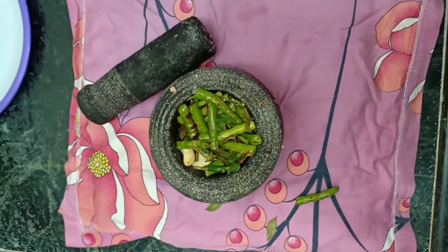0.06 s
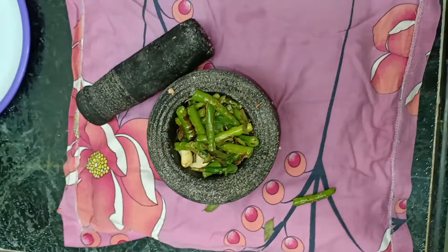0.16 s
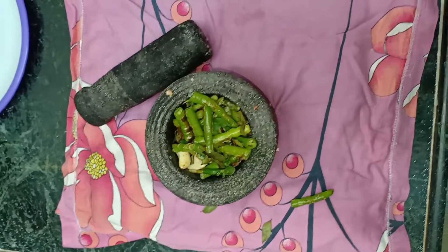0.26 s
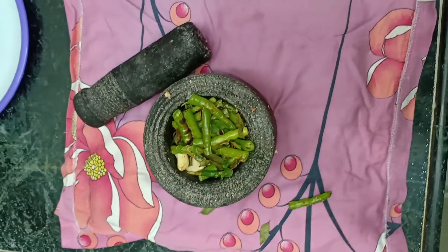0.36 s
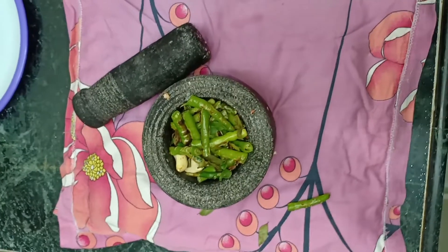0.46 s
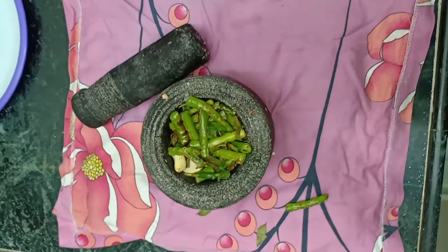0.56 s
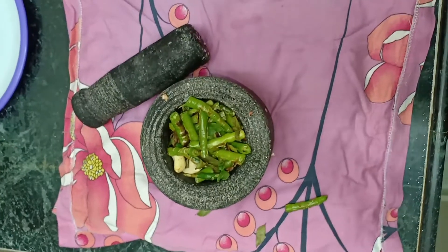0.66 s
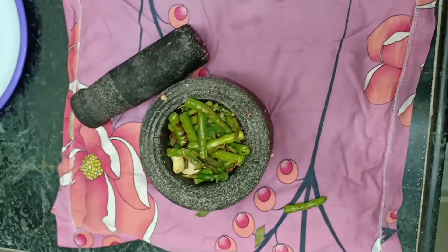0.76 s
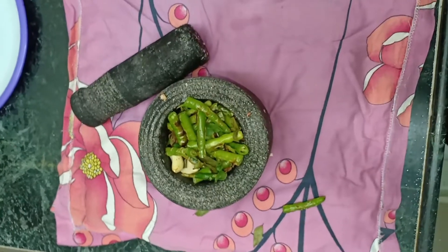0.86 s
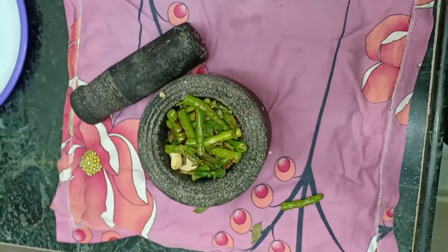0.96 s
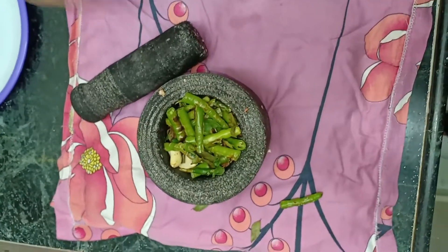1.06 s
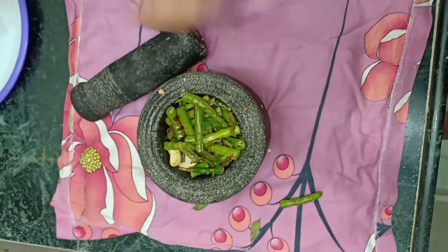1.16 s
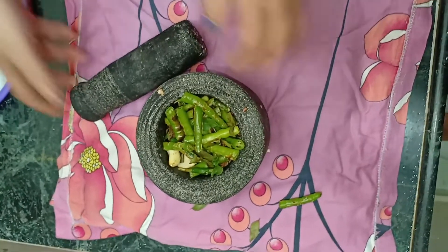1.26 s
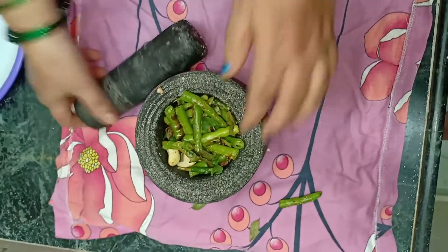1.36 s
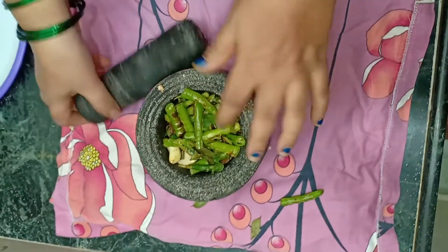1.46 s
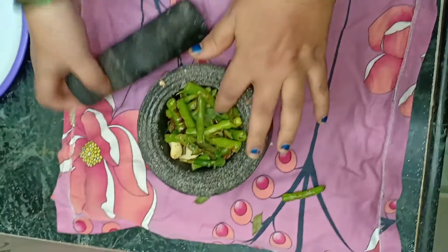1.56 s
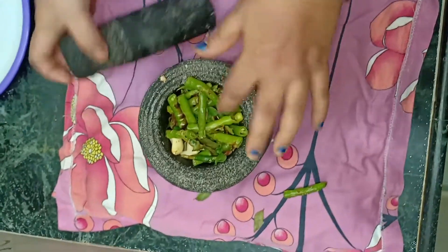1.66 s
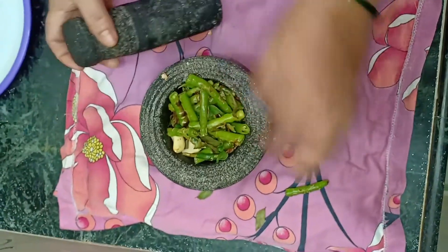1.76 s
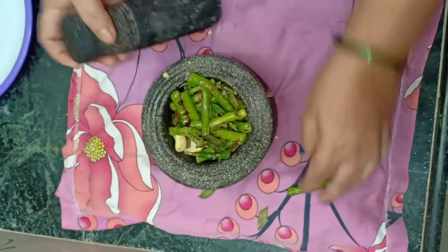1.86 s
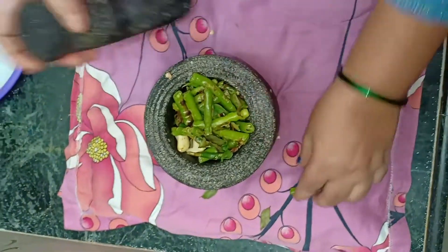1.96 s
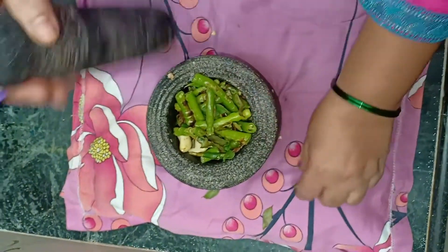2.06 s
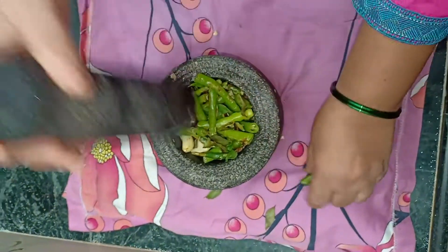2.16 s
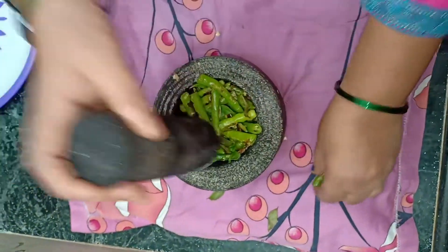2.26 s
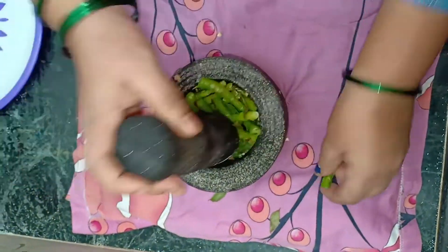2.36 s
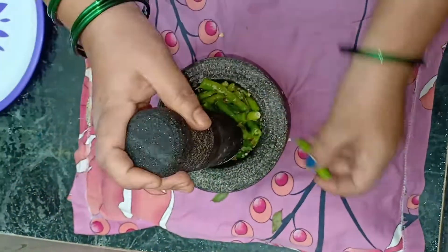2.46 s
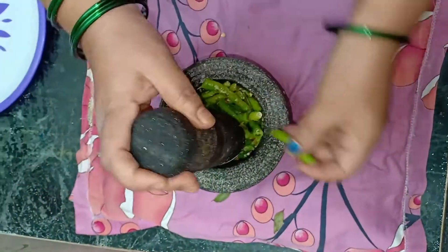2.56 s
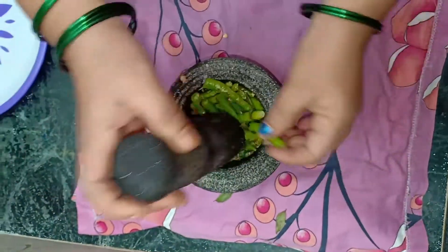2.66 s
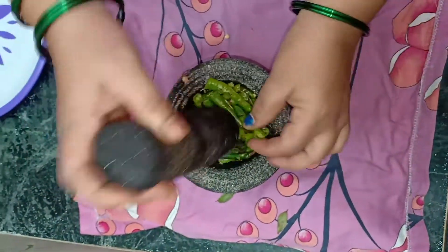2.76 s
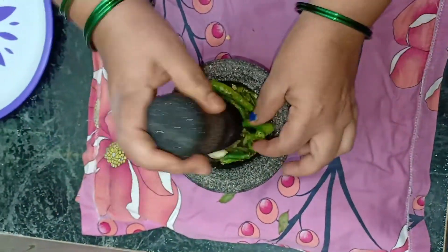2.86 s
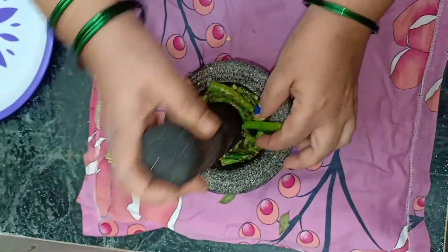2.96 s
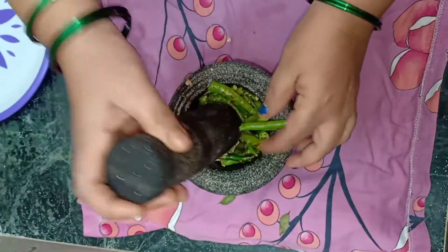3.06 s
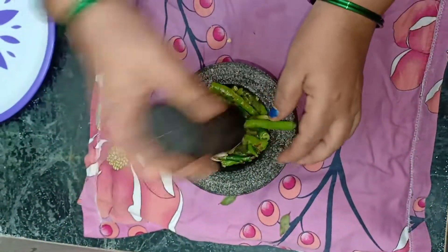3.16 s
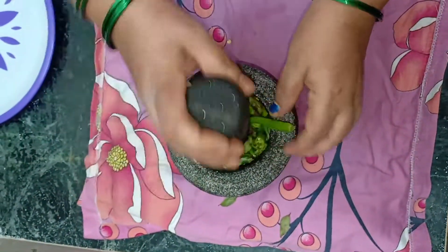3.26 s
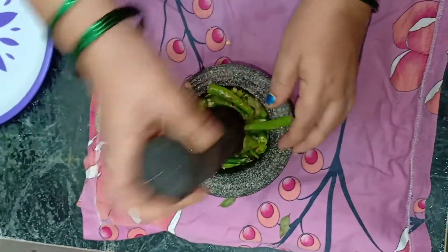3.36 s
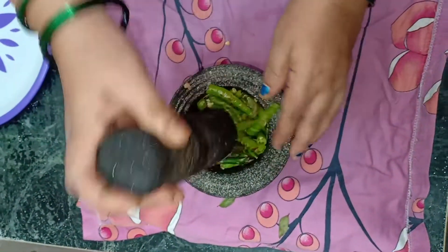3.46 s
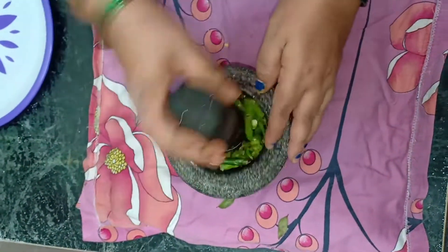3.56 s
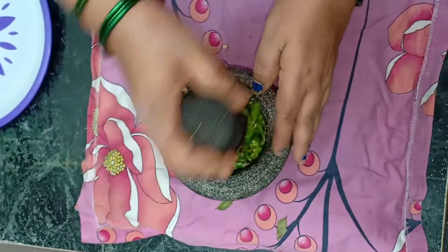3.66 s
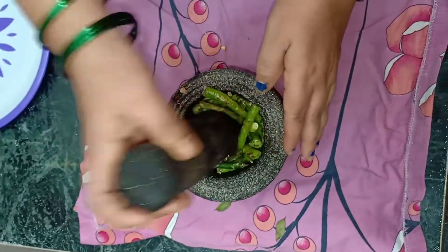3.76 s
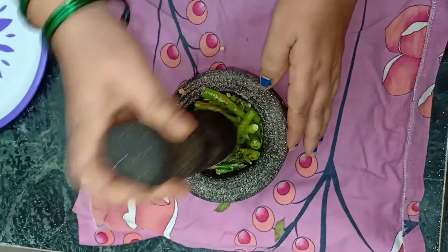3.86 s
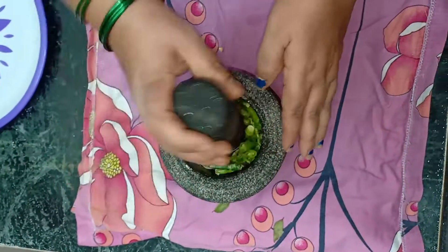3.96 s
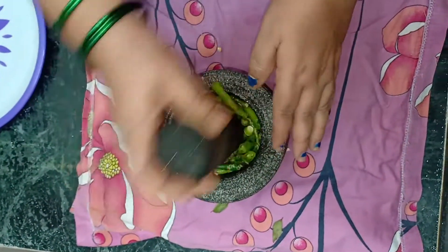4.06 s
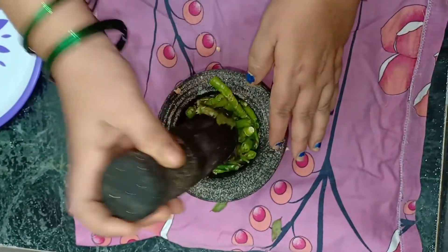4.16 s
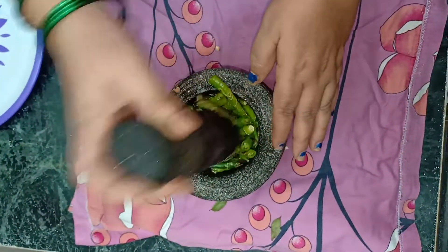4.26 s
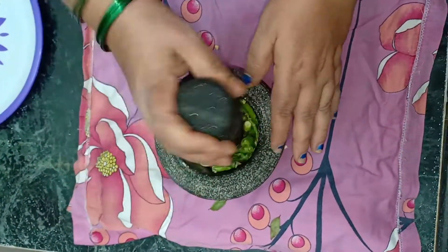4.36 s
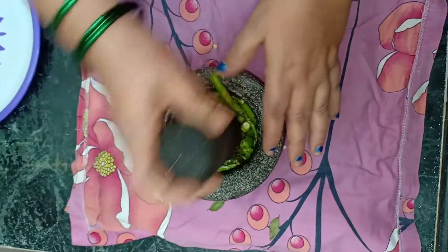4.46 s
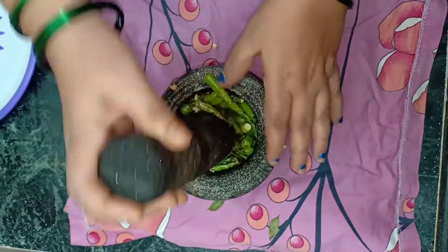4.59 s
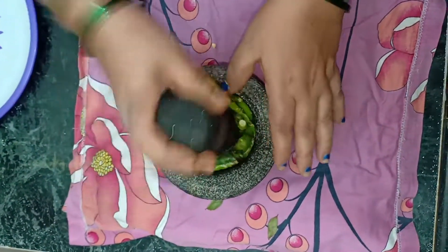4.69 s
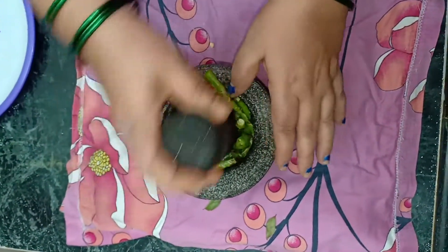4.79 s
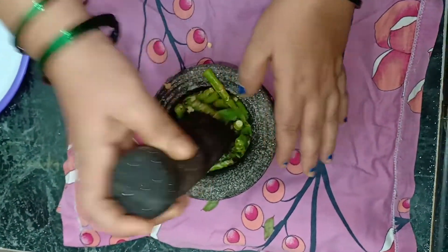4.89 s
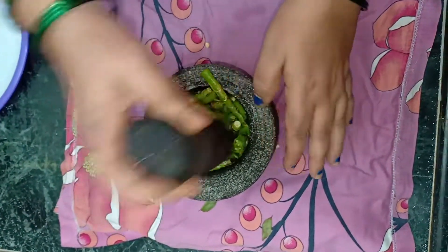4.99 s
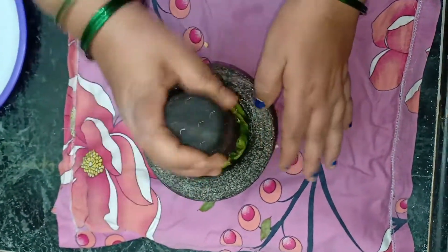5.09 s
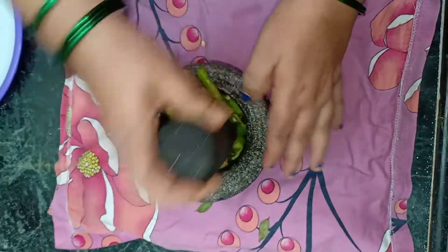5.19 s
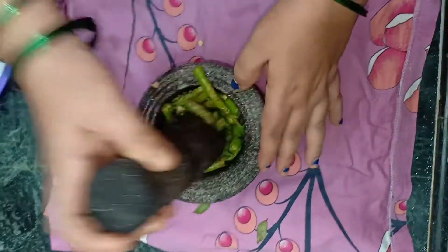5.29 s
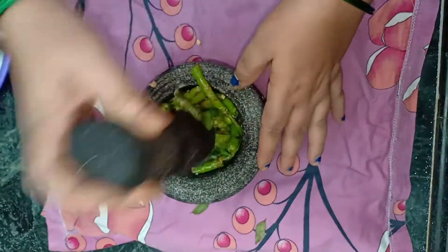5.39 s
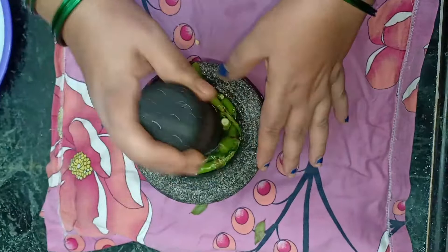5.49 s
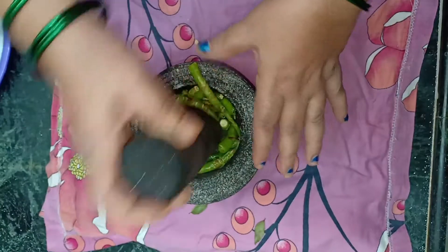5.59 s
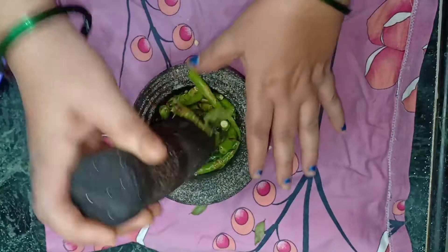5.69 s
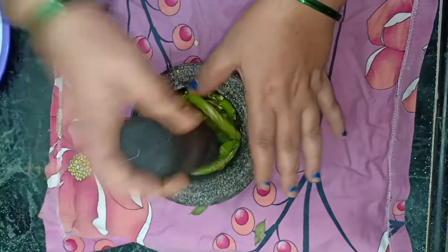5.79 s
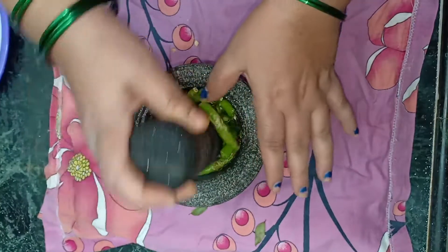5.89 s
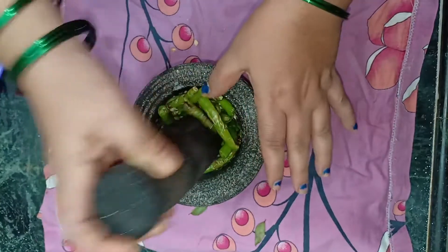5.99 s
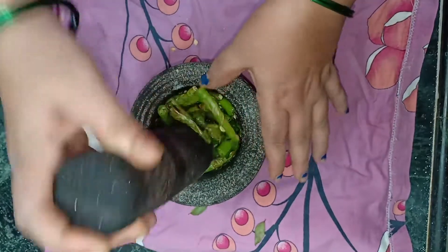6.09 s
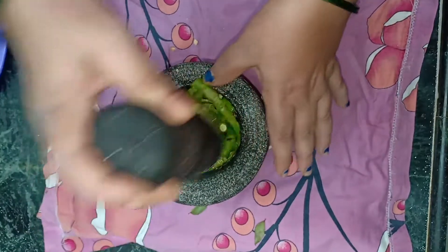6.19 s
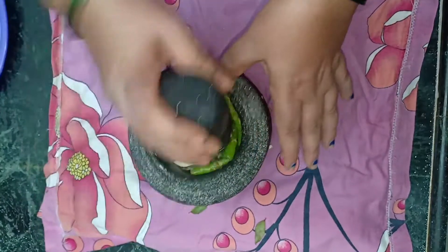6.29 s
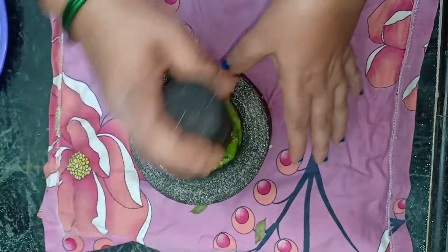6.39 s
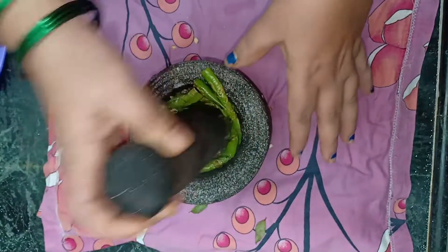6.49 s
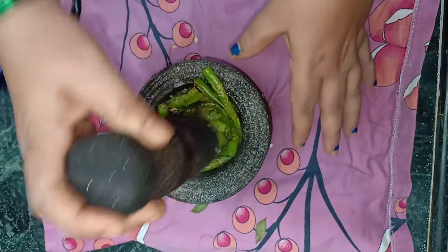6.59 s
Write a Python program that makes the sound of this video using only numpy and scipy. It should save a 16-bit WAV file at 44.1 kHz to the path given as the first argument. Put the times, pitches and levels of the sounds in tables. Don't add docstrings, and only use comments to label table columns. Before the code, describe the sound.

Close stereo pickup over a stone mortar in a small, lightly reverberant kitchen. First a distant metal vessel, lid and spoon rattle and ring on the right, then only soft room hum and tiny glass bangle clinks. A hard stone rim knock begins the pounding: first blows muffled by whole chillies, later ones harder, ringing and crackling, with a low floor shudder and food shifting between, until a final blow with a rim knock.

```python
import sys
import numpy as np
from scipy import signal
from scipy.fft import rfft, irfft, next_fast_len
from scipy.io import wavfile
from scipy.ndimage import uniform_filter1d

SR = 44100
rng = np.random.default_rng(int(sys.argv[2]) if len(sys.argv) > 2 else 0)


def field_ratio(decibels):
    return 10 ** (np.asarray(decibels, dtype=float) / 20)


def store_wav(level_fs):
    pcm = np.round(np.clip(np.atleast_2d(level_fs), -1, 1) * 32767)
    wavfile.write(sys.argv[1], SR, pcm.T.astype(np.int16))


N = 292824

# frequency [Hz], level [dB].
CRUSH = [(150, -5.5), (250, -10.5), (500, -31), (800, -9), (1400, -9), (2600, -5), (3500, -11.5),
         (5400, -11), (7300, -21.5), (9900, -29.5), (11500, -18), (14800, -28), (15600, -16.5),
         (16200, -61)]


def evened(x):
    return x / np.sqrt(np.mean(x ** 2) + 1e-20)


def read(points, hz):
    f, value = np.transpose(points)
    return np.interp(np.log(hz + 1), np.log(f + 1), value)


def add(mix, s, sound):
    part = mix[round(s * SR):][:len(sound)]
    part += sound[:len(part)]


def band(x, lo_hz, hi_hz):
    edges = [lo_hz, min(hi_hz, SR / 2.1)]
    return signal.sosfilt(signal.butter(2, edges, "bandpass", fs=SR, output="sos"), x)


def coloured(x, spectrum):
    gain_db = np.maximum(read(spectrum, abs(np.fft.fftfreq(4096, 1 / SR))), -100)
    log_gain = np.log(field_ratio(gain_db))
    taps = np.fft.ifft(np.exp(np.conj(signal.hilbert(log_gain)))).real[:2048]
    return signal.oaconvolve(x, taps / np.linalg.norm(taps))[:len(x)]


def resonate(x, hz, width):
    turn = np.exp(2j * np.pi * hz * np.arange(len(x)) / SR)
    r = np.exp(-np.pi * width / SR)
    return 2 * (turn * signal.lfilter([1 - r], [1, -r], x / turn)).real


def ring(modes, seconds):
    t = np.arange(round(seconds * SR)) / SR
    return sum(field_ratio(db - 60 * t / t60) * np.sin(2 * np.pi * hz * t) for hz, db, t60 in modes)


def grit(count, per_s, spread_db):
    size = field_ratio(spread_db * np.minimum(rng.exponential(1, count), 4)) * rng.choice([-1, 1], count)
    return evened(size * (rng.random(count) < per_s / SR))


def plateau(t, start, hold, rise_db_per_s, fall_db_per_s):
    rise_db = rise_db_per_s * (t - start)
    fall_db = fall_db_per_s * (start + hold - t)
    return field_ratio(np.minimum(0, np.minimum(rise_db, fall_db)))


def diffuse(shape, frames, size):
    # frequency [Hz], correlation [-1 to 1].
    likeness = [(60, 0.8), (130, 0.95), (370, 0.85), (640, -0.041), (1410, 0.03), (3100, -0.034),
                (6820, -0.076), (15000, -0.014)]
    hz, t = np.fft.rfftfreq(size, 1 / SR)[:, None], np.arange(frames) * size / 4 / SR
    a, b, c, d = rng.standard_normal((frames, len(hz), 4)).T
    same = np.clip(read(likeness, hz), -1, 1)
    left = a + 1j * b
    right = same * left + np.sqrt(1 - same ** 2) * (c + 1j * d)
    z = np.array([left, right]) * field_ratio(shape(hz, t))
    return signal.istft(z, nperseg=size, noverlap=size * 3 // 4)[1]


def placed(x, lag, pan_db, wet_db, gap_s, send=None, early_db=0):
    # frequency [Hz], t60 [s].
    kitchen = [(100, 0.28), (500, 0.58), (1500, 0.31), (4500, 0.32), (12000, 0.25)]
    # left delay [s], right delay [s], level [dB].
    early = [(.0031, 0.004, -4.5), (.0069, .0056, -9), (.0092, .0108, -10), (0.0116, .0137, -10),
             (.019, .0165, -13.5)]
    tail = diffuse(lambda hz, t: -60 * t / read(kitchen, hz), frames=420, size=256)
    t = np.arange(tail.shape[1]) / SR
    tail = tail * np.clip(t / gap_s, 0, 1) ** 2
    tail = tail / np.linalg.norm(tail, axis=1, keepdims=True)
    for left_s, right_s, db in early:
        delays = [round(left_s * SR), round(right_s * SR)]
        tail[[0, 1], delays] += field_ratio(db + early_db) * rng.choice([-1, 1], 2)
    size = next_fast_len(N, real=True)
    turns = np.fft.rfftfreq(size) * read(lag, np.fft.rfftfreq(size, 1 / SR))
    late = irfft(rfft(x, size) * np.exp(-2j * np.pi * turns), size)[:N]
    direct = np.array([late * field_ratio(pan_db / 2), x * field_ratio(-pan_db / 2)])
    fed = x if send is None else send
    return direct + field_ratio(wet_db) * signal.fftconvolve(fed[None], tail, axes=1)[:, :N]


def air():
    # frequency [Hz], level [dB].
    hum_colour = [(15, -48), (25, -26), (38, -21), (80, -2), (180, 1), (223, -5), (489, -8.5), (1130, -14),
                  (1290, -17.5), (1700, -14.5), (1840, -12.5), (5140, -25), (8140, -35), (14800, -38),
                  (16000, -31)]
    # frequency [Hz], width [Hz], level [dB].
    whine = [(1744, 9, -70), (5230, 130, -72), (15420, 60, -88), (14400, 100, -87), (188, 64, -69.5)]
    hum_db, patchy_db = -52.5, 1.5
    swell_db, slowest_hz, fastest_hz = 0, 0.16, 2.06
    stir_start_s, stir_end_s, stir_fade_s, stir_db = 0.28, 2.17, 0.037, 2
    tones = 0
    for hz, width, db in whine:
        pair = [evened(resonate(noise, hz, width)) for noise in rng.standard_normal((2, N))]
        tones = tones + field_ratio(db) * np.array(pair)
    rates, phases = np.geomspace(slowest_hz, fastest_hz, 20)[:, None], rng.random((20, 1))

    def shape(hz, t):
        low = 1 / (1 + (hz / 500) ** 2)
        swell = evened((np.sin(2 * np.pi * (rates * t + phases)) / np.sqrt(rates)).sum(0))
        stir = np.clip(np.minimum(t - stir_start_s, stir_end_s - t) / stir_fade_s + .5, 0, 1)
        patches = uniform_filter1d(rng.standard_normal((len(t), len(hz))), size=16, axis=0)
        patches = evened(uniform_filter1d(patches, size=16, axis=1)).T
        steady = read(hum_colour, hz) - 30 * (hz > 15700)
        return patchy_db * patches + steady + low * swell_db * swell + (1 - low) * (stir_db * stir - 2.5)
    hum = diffuse(shape, frames=N // 256 + 8, size=1024)[:, :N]
    return field_ratio(hum_db) * evened(hum) + tones


def clatter():
    # time [s], peak [dB], brightness [dB per octave], rattle [dB].
    bumps = [
        (0.179, -27, -4, 4.5),
        (0.2297, -34, -13, -5),
        (0.303, -28, -6.5, 0.5),
        (0.334, -28.5, -8.5, -9),
        (0.3904, -19, 4.5, 2.5),
        (0.429, -27.5, -8.5, 4.5),
        (0.524, -31.5, -5, 1.5),
        (0.5458, -22, -2.5, 1),
        (0.576, -34.5, -5, 5),
    ]
    # frequency [Hz], level [dB], t60 [s].
    vessel = [(336.2, -6.5, 0.18), (389, -14, 0.19), (486, -2, 0.11), (690, -27, 0.11), (765, -4, 0.19),
              (846, 7.5, 0.086), (957, 0, 0.17), (1434, 9, 0.2), (2220, -13, 0.13), (2280, 2, 0.13),
              (2254, 4.5, 0.17), (2640, -22, 0.14), (3210, -1, 0.14), (3980, -20, 0.2), (4720, -7, 0.12),
              (4960, -6, 0.1), (5600, 2, 0.063), (6010, -6, 0.043), (6890, -14, 0.12), (7850, -46, 0.062),
              (8300, -37, .08), (9000, -32, 0.15), (11100, -24, 0.093)]
    # frequency [Hz], level [dB].
    rattle_colour = [(150, -53), (250, -47), (333, -13.5), (855, -5), (1300, -9), (1420, -2), (1920, -11),
                     (2310, 2.5), (2920, -16.5), (5540, -23.5), (14000, -85)]
    out = np.zeros(N)
    hz, mode_db, t60 = np.transpose(vessel)
    t = np.arange(16000) / SR
    for s, db, tilt_db, rattle_db in bumps:
        shares_db = mode_db + tilt_db * np.log2(hz / 1500) + 1.5 * rng.standard_normal(len(hz))
        detuned = hz * rng.uniform(.997, 1.003, len(hz))
        bump = evened(ring(zip(detuned, shares_db, t60), 16000 / SR))
        shaking = grit(count=16000, per_s=3000., spread_db=7.5) * field_ratio(-60 * t / 0.094)
        rattle = evened(coloured(shaking, rattle_colour))
        add(out, s, field_ratio(db - 22) * band(bump + field_ratio(rattle_db) * rattle, 290, 15000))
    return out


def clinks():
    # frequency [Hz], level [dB], t60 [s].
    lid = [(335.3, -5.5, .3), (525, 4, 0.12), (818, -8, 0.33), (1100, -12, 0.34), (1470, -11, 0.23),
           (2170, -3, 0.25), (2220, 3.5, 0.32), (2560, -20, 0.33), (3040, -0.5, 0.12), (3240, -2, .25),
           (3820, -5.5, 0.24), (4506, -19, 0.23), (5360, -13, 0.13)]
    cup = [(500, -12, 0.28), (820, -13, 0.33), (1120, -1, 0.26), (1467, 2, 0.71), (2236, 5, .12),
           (2325, 5, .14), (2640, 2.5, 0.4), (3247, -2, 0.33), (3800, -17, .3), (4470, -10, 0.24),
           (4900, -11, 0.35), (5590, -6, .2), (5949, -17, 0.12), (6831, -14, .2)]
    tray = [(330, -6.5, 0.43), (447, -12, 0.36), (672, -6, 0.26), (853, -17, 0.23), (980, -12, 0.37),
            (1420, -1, 0.24), (2314, -5, 0.45), (2295, 6, 0.08), (2600, -22, 0.27), (3289, -17, 0.32),
            (3795, -19, .2), (4660, -7, 0.29), (4900, -24, .3), (5905, -29, .3)]
    spoon = [(6094, -5, .12), (6481, -9, .12), (7450, -16, .2), (7800, -24, .16), (8300, -20, 0.28),
             (9250, -14, .2), (10340, -15, .2), (11150, -11, 0.17)]
    # time [s], peak [dB].
    lid_hits = [
        (0.1808, -36),
        (0.23, -44),
    ]
    cup_hits = [
        (0.391, -30.5),
        (0.431, -44),
    ]
    tray_hits = [
        (0.307, -49),
        (0.53, -50),
        (0.5467, -34),
        (.58, -42),
    ]
    spoon_hits = [
        (.1803, -58),
        (.3075, -69),
        (.3914, -40),
        (.46, -52),
        (.5465, -64),
    ]
    out = np.zeros(N)
    for modes, hits in (lid, lid_hits), (cup, cup_hits), (tray, tray_hits), (spoon, spoon_hits):
        for s, db in hits:
            add(out, s, field_ratio(db) * ring(modes, .5))
    return out


def bangles():
    # time [s], level [dB], pitch [Hz], width [Hz], t60 [s].
    touches = [(1.03, -66, 13500, 200, 0.091), (1.28, -68, 11300, 200, .08), (1.41, -59, 2430, 150, .15),
               (1.433, -50, 2920, 260, 0.11), (1.445, -56, 3130, 200, 0.11), (1.439, -55, 4360, 300, 0.11),
               (1.558, -60, 14400, 200, 0.13), (1.558, -63, 11300, 150, .08),
               (1.557, -58, 9000, 101, 0.074), (2.165, -51, 14150, 150, 0.083),
               (4.474, -44.5, 5300, 500, 0.081), (4.476, -58, 6060, 300, 0.11),
               (4.482, -61, 4450, 200, 0.18), (.86, -64, 2995, 250, 0.24), (.87, -63, 2300, 250, 0.17),
               (1.97, -62, 2600, 302, .3)]
    out, t = np.zeros(N), np.arange(8000) / SR
    for s, db, hz, width, t60 in touches:
        rub = evened(resonate(resonate(rng.standard_normal(8000), hz, width), hz, width))
        add(out, s, rub * field_ratio(db - 60 * t / t60))
    return out


def rustle():
    # start [s], level [dB], treble share [dB], hold [s].
    shifts = [(2.243, -36, -16, 0.044), (2.395, -49, -17, 0.028), (2.528, -47, -17, 0.024),
              (2.774, -52.5, -11, 0.063), (2.876, -48, -18, 0.036), (3.16, -50.5, -13.5, 0.12),
              (3.52, -53, -12, 0.16), (3.908, -47.5, -15.5, 0.12), (4.283, -50, -15, 0.12),
              (4.696, -52, -16, 0.087), (5.035, -50, -17.5, 0.11), (5.421, -50.5, -26, .08),
              (5.783, -53, -15.5, 0.1), (6.249, -55, -16, 0.13)]
    start, db, treble_db, hold = np.transpose(shifts)[:, :, None]
    moving = field_ratio(db) * plateau(np.arange(N) / SR, start, hold, rise_db_per_s=413, fall_db_per_s=232)
    grains = coloured(grit(count=N, per_s=4000., spread_db=6.5), CRUSH)
    body = field_ratio(-3.5) * moving.sum(0) * evened(band(grains, 540, 10700))
    treble = field_ratio(4.5) * (field_ratio(treble_db) * moving).sum(0) * evened(band(grains, 6230, 24000))
    return body + treble


def cracks():
    # time [s], peak [dB], pitch [Hz],
    # upper ring [dB].
    cracking_food = [(2.268, -33, 2900, -5), (2.282, -29, 3200, 2), (2.294, -32, 2700, 5),
                     (2.315, -28.5, 2400, 3.5), (2.328, -45, 3000, 0), (2.889, -37, 2300, -4),
                     (3.0677, -36, 2600, -10), (3.075, -35, 2600, 1), (3.0773, -35, 2500, 6),
                     (3.2207, -42, 2600, 11), (3.448, -37, 2600, 6), (3.826, -38, 2600, -1),
                     (3.8322, -26, 2500, 4), (4.223, -35, 2700, 7), (4.2303, -22, 2700, -10),
                     (4.2362, -21, 2500, -1), (4.242, -13.5, 2400, -11), (4.6, -28, 2700, 6),
                     (4.6092, -27, 2560, -13), (4.6151, -12, 2610, -19), (4.6139, -25, 2800, -10),
                     (4.9704, -18, 2430, -9), (4.9722, -11.5, 2330, 4.5), (2.8393, -39.5, 3560, 14.5),
                     (6.1515, -38, 2300, -8), (5.3463, -34, 2500, -8), (5.3487, -26, 2500, -9),
                     (5.6972, -45, 2600, -3), (4.9521, -23, 2600, -12), (4.966, -18, 2700, -10),
                     (4.9738, -18, 2300, 7.5), (5.7025, -35, 2210, -8), (5.7065, -31, 2400, -10),
                     (5.7114, -13, 2600, -22), (5.7217, -30, 2500, -10), (4.2388, -23, 2300, -8),
                     (4.248, -27, 1800, -10), (4.625, -27, 2600, -8), (3.0796, -31, 1900, -6),
                     (3.101, -32, 2300, -2), (3.8458, -17, 2500, 0.5), (6.1728, -26, 2370, -3),
                     (2.7165, -23, 2800, -4), (2.7238, -24, 2400, -2), (2.7285, -23, 2200, 5),
                     (2.742, -30, 2500, -3), (3.0895, -28, 2000, -1), (3.4975, -31, 2500, -2),
                     (3.5127, -35, 2500, -4), (3.485, -36, 2500, -4), (3.548, -42, 3500, 4),
                     (3.8925, -36, 2500, -4), (4.31, -38, 2500, -4), (5.356, -16, 2300, 2),
                     (5.773, -40, 2500, 0), (6.6272, -8, 2200, -3)]
    out, click = np.zeros(N), 1. * (np.arange(600) == 0)
    high = resonate(click, 5030, 800.0)
    for s, db, hz, upper_db in cracking_food:
        low = resonate(click, hz, 280)
        both = low / low.max() + field_ratio(upper_db) * high / high.max()
        add(out, s, field_ratio(db) * band(both, 1200, 6600))
    return out


def snaps():
    # time [s], peak [dB], pitch [Hz], treble [dB].
    breaks = [(1.276, -32, 2400, -19), (1.559, -36, 2790, -6), (2.161, -31, 5540, -9),
              (2.192, -22.5, 3280, -29.5), (2.199, -23, 2060, -24), (2.416, -30, 2640, -22),
              (2.4374, -36, 3105, -21), (2.505, -26, 2720, -29), (2.5252, -38, 2490, -21),
              (2.84, -25, 2630, -8), (2.855, -27, 2460, -33), (2.9236, -18, 2660, -24),
              (2.9515, -18, 2730, -32), (3.211, -25, 3920, -12), (3.2201, -41, 2590, -3),
              (3.2354, -21, 2660, -47), (3.3538, -32, 2520, -22), (3.548, -32, 5300, -16),
              (3.6143, -19, 2000, -15.5), (3.6384, -24, 2430, -30), (3.9547, -23, 2660, -26),
              (3.9951, -18, 2500, -20), (4.598, -17, 2580, -18.5), (4.9333, -30.5, 2455, -24),
              (4.954, -10, 2790, -24.5), (5.0616, -15, 5300, -18), (5.492, -41, 2000, -30),
              (5.9031, -31, 2440, -17), (6.151, -30, 2140, -17), (6.1657, -15, 2440, -23)]
    out = np.zeros(N)
    fade = np.exp(-np.arange(400) / 45.)
    for s, db, hz, treble_db in breaks:
        crack = 0.27 * evened(rng.standard_normal(400) * fade)
        snap = 0.33 * band(crack, 2300, 6700) + 2.0 * resonate(crack, hz, 460)
        snap += field_ratio(treble_db + 7.0) * band(crack, 10000, 15000)
        add(out, s, field_ratio(db - 5.5) * snap)
    return out


def knocks():
    # time [s], peak [dB], chatter [Hz], chatter rise [s], ring [dB].
    rim_hits = [
        (2.2054, -3.5, 1500, 0.00052, 1.5),
        (6.604, -11, 1800, 0.00056, -1.5),
    ]
    # frequency [Hz], level [dB], t60 [s].
    rim_modes = [(212.6, -8, 0.14), (354, -6, 0.041), (482, -4.5, 0.07), (664, -7, 0.019),
                 (717, -17.5, 0.2), (785, -7, 0.06), (276, -19, 0.098), (869, -16, 0.49), (912, -16, 0.59),
                 (960, -10, 0.34), (1047, -14, 0.41), (400.5, -12, 0.15), (994, -3.5, 0.14),
                 (1075, -14.5, 0.2), (1127, -14, 0.34), (2040, -3.5, 0.046), (2170, -11, 0.08),
                 (2720, 3, 0.0046), (1217, -18, 0.25), (5400, -7.5, 0.003), (6320, -24.5, 0.078),
                 (7100, -19, 0.072)]
    out, t = np.zeros(N), np.arange(300) / SR
    rim = ring(rim_modes, 0.61)
    for s, db, hz, rise_s, ring_db in rim_hits:
        force = t / rise_s * np.exp(1 - t / rise_s)
        add(out, s, field_ratio(db) * np.sin(2 * np.pi * hz * t) * force)
        add(out, s + 0.00063, -field_ratio(db + ring_db) * rim / abs(rim).max())
    return band(out, 185, 5900)


def thuds():
    # time of largest swing [s], peak [dB], share of thin parts [dB].
    shakes = [(2.216, -29.5, -7.5), (2.7445, -34.5, -4), (3.1028, -23, -6), (3.473, -20.5, -11.5),
              (3.855, -23.5, -8.5), (4.2511, -19, -6), (4.6248, -17, -8), (4.983, -24.5, -9.5),
              (5.3656, -19.5, -8), (5.723, -25, -7.5), (6.206, -41.5, -8), (6.638, -31, -8)]
    # frequency [Hz], level [dB], t60 [s], direction of first swing [sign].
    slab = [(70.3, -5.0, 0.168, -1), (81.7, -10.3, 0.166, 1), (96.2, -28.2, 0.7, -1),
            (105.1, -3.9, 0.653, 1), (110.8, -7.9, 0.461, -1), (127.2, -10.8, 0.7, 1),
            (142.5, -8.7, 0.294, 1), (179.6, -17.2, 0.345, -1), (199.9, -17.7, 0.464, -1),
            (218.5, -14.2, 0.047, 1), (247.0, -21.0, 0.168, 1)]
    # frequency [Hz], level [dB], t60 [s].
    footing = [(51.8, -37, 1), (39.6, -27, 0.77)]
    # frequency [Hz], level [dB], t60 [s].
    slab_edge = [(76.8, -15, 0.99), (123.6, -9.5, 1), (163.3, -10, 0.29), (205.3, -6, 0.24),
                 (260, -6, 0.13), (343, -9, 0.076)]
    lead_s, rise_s = .00875, 0.0045
    out = np.zeros(N)
    shudder = sum(way * ring([(hz, db, t60)], .7) for hz, db, t60, way in slab) + ring(footing, .7)
    edge = ring(slab_edge, .7)
    rise = np.sin(np.pi / 2 * np.minimum(np.arange(len(shudder)) / SR / rise_s, 1)) ** 2
    for s, db, edge_db in shakes:
        add(out, s - lead_s, field_ratio(db) * rise * (shudder + field_ratio(edge_db) * edge))
    return out


def blows():
    # hardest contact [s], peak [dB], contact width [s], crushing before contact [s], crispness [dB].
    strokes = [(2.721, -20.5, 0.016, 0.009, 6.5), (3.0876, -17, 0.0068, 0.025, 8.5),
               (3.4575, -16.5, 0.0075, 0.018, 4), (3.842, -20, .01, 0.021, 10.5),
               (4.2391, -13.5, 0.0064, 0.024, 2.5), (4.611, -12, 0.006, 0.023, -5),
               (4.9682, -13.5, 0.0037, 0.024, 14), (5.3515, -15, 0.0063, 0.011, 7),
               (5.71, -15.5, 0.006, 0.022, -1), (6.1895, -25.5, 0.014, 0.04, 0),
               (6.6245, -13, 0.008, 0.024, 1)]
    bowl_hz = [2000, 2000, 2500, 2500, 2400, 2700, 2600, 2300, 2600, 2300, 2100]
    # frequency [Hz], width [Hz], level [dB].
    bowl = [(4350, 1400, -10.5), (5300, 2100, -8.5)]
    # frequency [Hz], width [Hz], level [dB].
    stone = [(1053, 24, 22.5), (1180, 25, 18), (1380, 260, 11.5), (2226, 52, 6.5)]
    # frequency [Hz], level [dB].
    contact_colour = [(150, -36.5), (300, -0.5), (600, -15.5), (1000, -17.5), (1500, -5), (2600, 2),
                      (3500, -7), (4300, -4.5), (5500, -3.5), (7500, -16), (10000, -18), (15000, -11.5),
                      (16200, -101)]
    usual_width_s = .007
    sink_db, sink_db_per_step = -5.5, 7.5
    settle_db, settle_db_per_step = -10, 7
    stone_db, cushion_db, cushioned_blows = 2.5, -33, 1.8
    near, far, t = np.zeros((3, N)), np.zeros((3, N)), np.arange(-3000, 6000) / SR
    for k, (s, db, width, sink, crisp_db) in enumerate(strokes):
        soft, cushioned = np.log2(width / usual_width_s), k < cushioned_blows
        sinking = field_ratio(sink_db + sink_db_per_step * soft) * np.clip(1 + t / sink, 0, 1) * (t < 0)
        settling = field_ratio(settle_db + settle_db_per_step * soft - 60 * t / 0.19) * (t >= 0)
        crush = coloured(grit(count=len(t), per_s=11000.0, spread_db=0.0) * (sinking + settling), CRUSH)
        crush = crush + (field_ratio(crisp_db) - 1) * band(crush, 4360, 28000)
        push = np.exp(-((t - width / 2) / width) ** 2 * 2.14)
        burst = grit(count=len(t), per_s=18000.0, spread_db=1.5) * push
        knock = np.linalg.norm(burst) * (np.arange(len(t)) == 3000 + round(width / 2 * SR))
        modes = [(f * rng.uniform(0.86, 0.87), w, d) for f, w, d in bowl]
        modes += [(bowl_hz[k], 600, 5)]
        ring_db = stone_db + cushion_db * cushioned
        modes += [(f * rng.uniform(0.91, 1.04), w, d + ring_db) for f, w, d in stone]
        for out, drive in (near, burst), (far, knock):
            contact = coloured(drive, contact_colour)
            body = sum(field_ratio(d) * resonate(contact, f, w) for f, w, d in modes)
            add(out[k % 3], s + t[0], field_ratio(db - 12.5) * (crush + contact + body))
    return zip(near, far)


def scene():
    # frequency [Hz], lateness of the left port [samples].
    near_lag = [(100, 8.2), (5000, 2.1), (7500, 1.77), (10500, 0.51), (12000, 2.68), (16000, 1.93)]
    far_lag = [(100, 3.8), (1300, 13.6), (16000, 9.5)]
    pans_db = [-.4, -.2, .8, -.8, 1.3]
    mortar_pan, food_pan, rim_pan, vessel_pan, slab_pan = pans_db
    mortar = sum(placed(spot, near_lag, mortar_pan, wet_db=-6.0, gap_s=0.0013, send=send)
                 for spot, send in blows())
    loose, sharp = rustle() + bangles(), cracks() + snaps()
    sent = loose + field_ratio(-5.5) * sharp
    food = placed(loose + sharp, near_lag, food_pan, wet_db=-2, gap_s=0.0016, send=sent)
    rim = placed(knocks(), near_lag, rim_pan, wet_db=-6, gap_s=0.0033)
    bumps, rings = clatter(), clinks()
    sent = bumps + field_ratio(-7.5) * rings
    far = placed(bumps + rings, far_lag, vessel_pan, wet_db=4.5, gap_s=0.0014, send=sent, early_db=-8)
    slab = placed(thuds(), near_lag, slab_pan, wet_db=-16.5, gap_s=0.0047, early_db=-20)
    return mortar + food + rim + far + slab + air()


def top_cut(x):
    return signal.sosfilt(signal.butter(12, 16460, fs=SR, output="sos"), x)


def record(dry):
    # frequency [Hz], left minus right [dB].
    ports = [(250, 1), (500, 4.5), (800, -1), (1100, 3), (1600, 0.5), (2300, 1), (5600, -1.5), (11000, 2)]
    # frequency [Hz], level [dB].
    capsule = [(8800, 0), (10100, -4), (11200, 0), (15650, 0), (15850, -28), (16400, -28)]
    bass_cut_hz, top_hz = 55, 16460
    hz = np.fft.rfftfreq(N, 1 / SR)
    lean_db = read(ports, hz) / 2
    ported = irfft(rfft(dry) * field_ratio(read(capsule, hz) + np.array([lean_db, -lean_db])), N)
    cut = signal.sosfilt(signal.butter(3, bass_cut_hz, "highpass", fs=SR, output="sos"), ported)
    limited = irfft(rfft(np.clip(cut, -1, 1)) * (hz < top_hz), N)
    return top_cut(limited + 0.0014)


dry = scene()
out = record(dry)
store_wav(out)
```